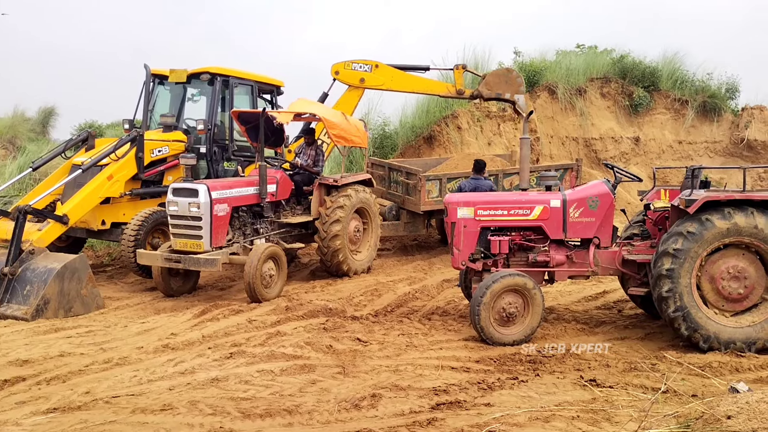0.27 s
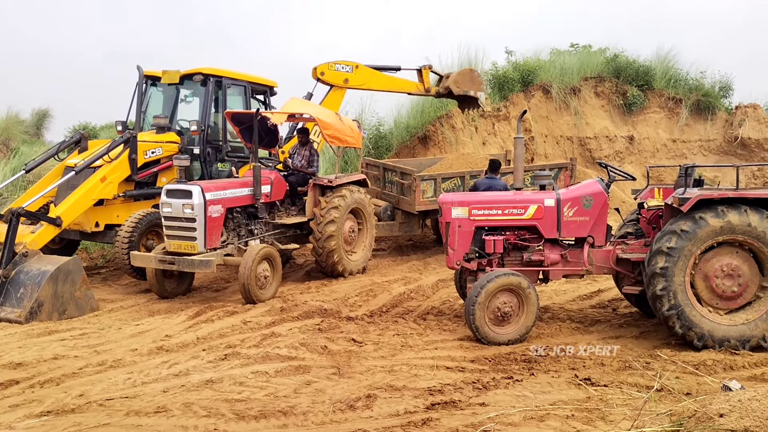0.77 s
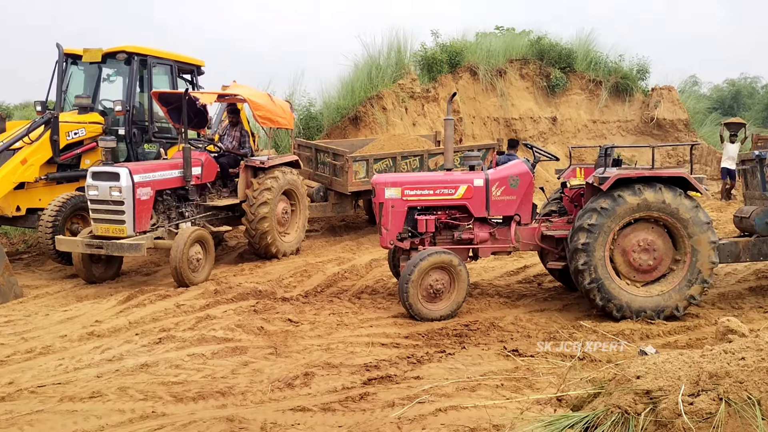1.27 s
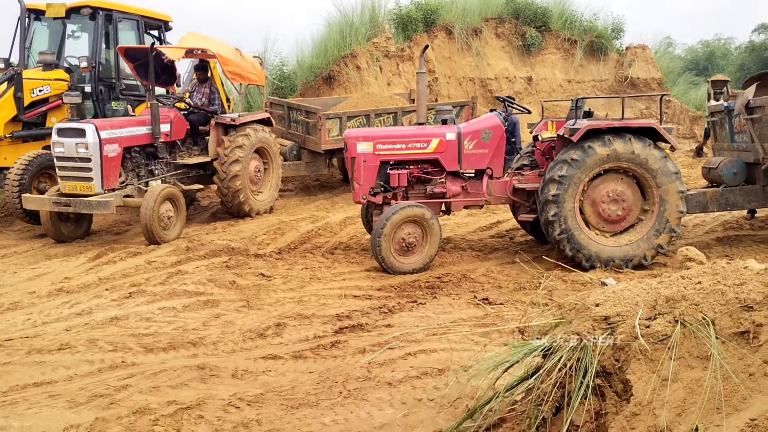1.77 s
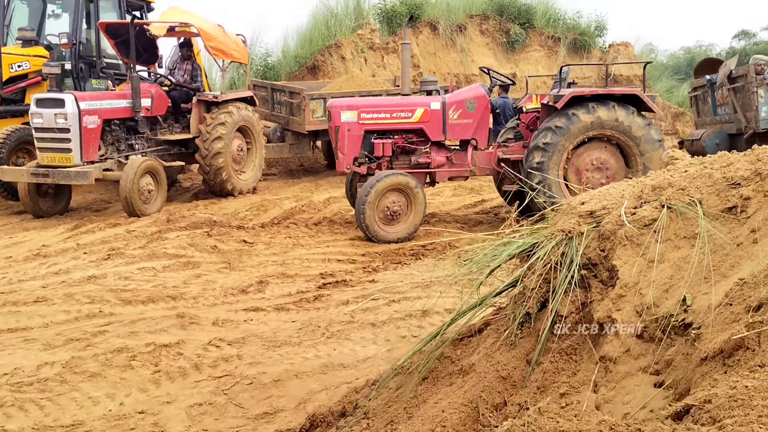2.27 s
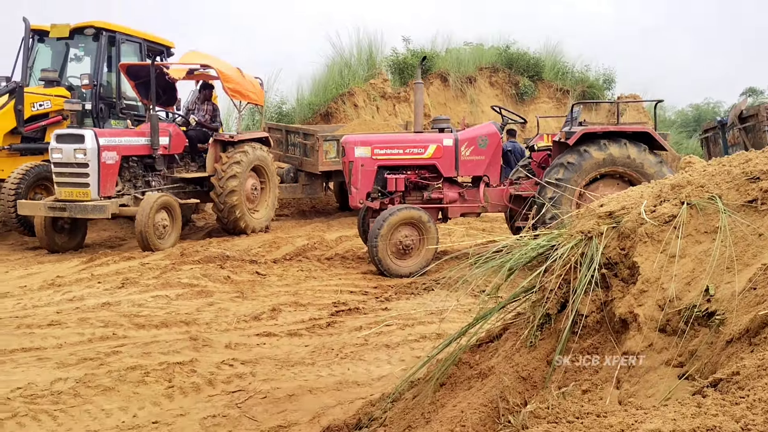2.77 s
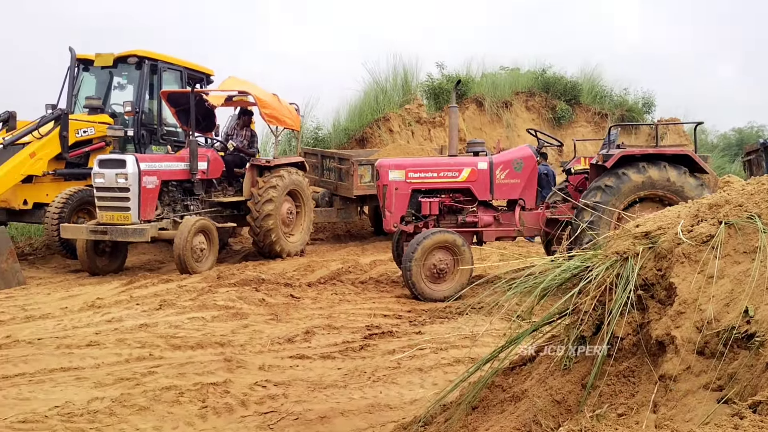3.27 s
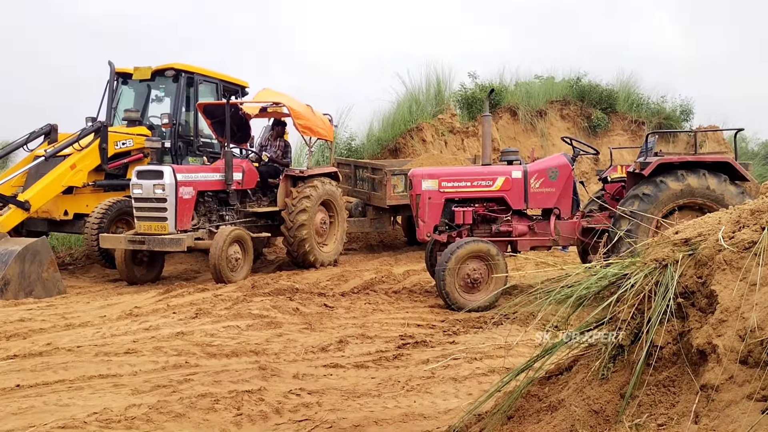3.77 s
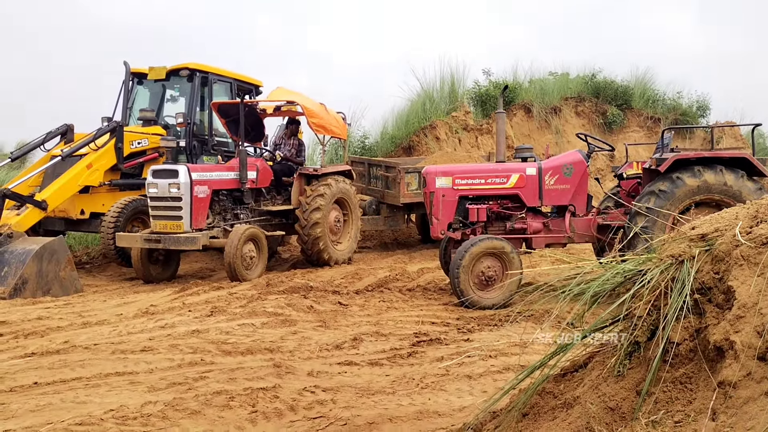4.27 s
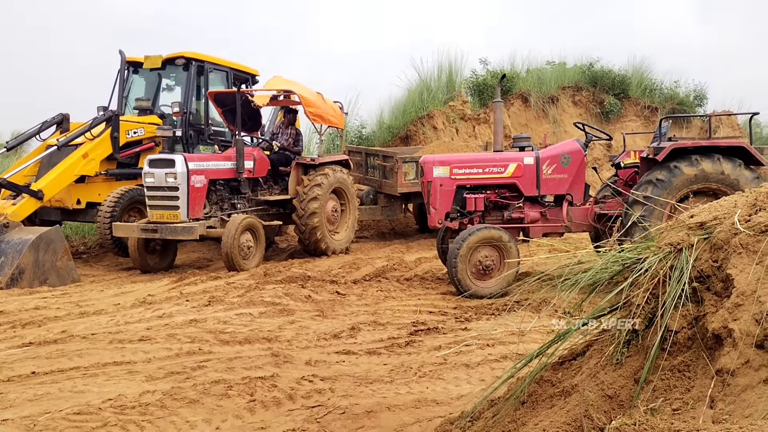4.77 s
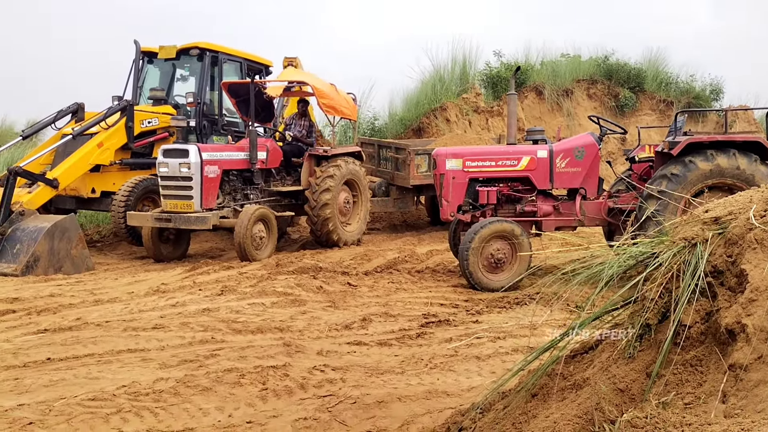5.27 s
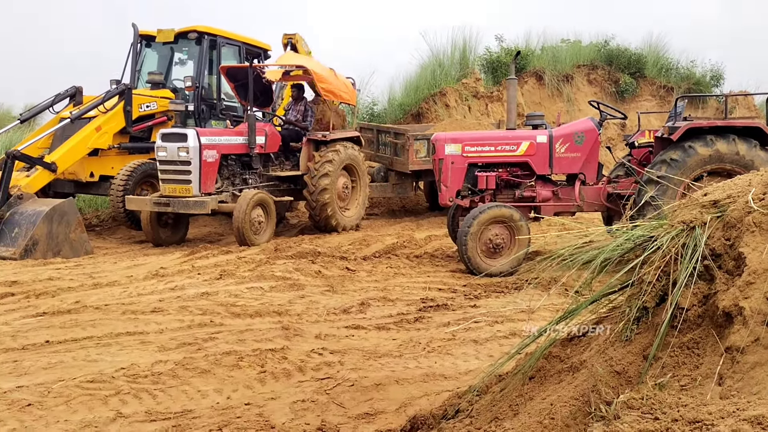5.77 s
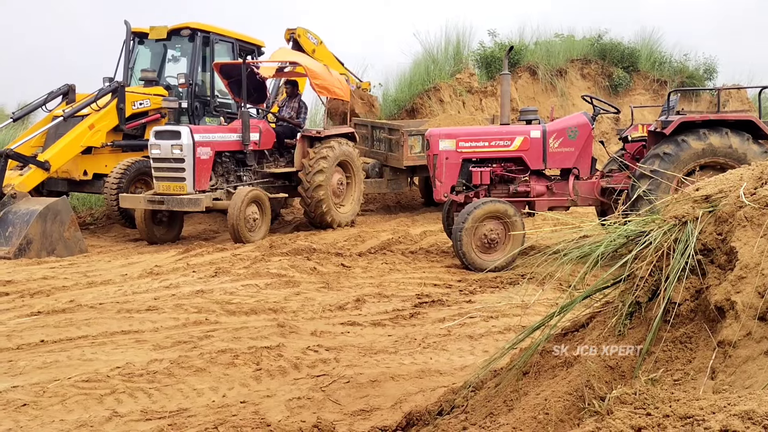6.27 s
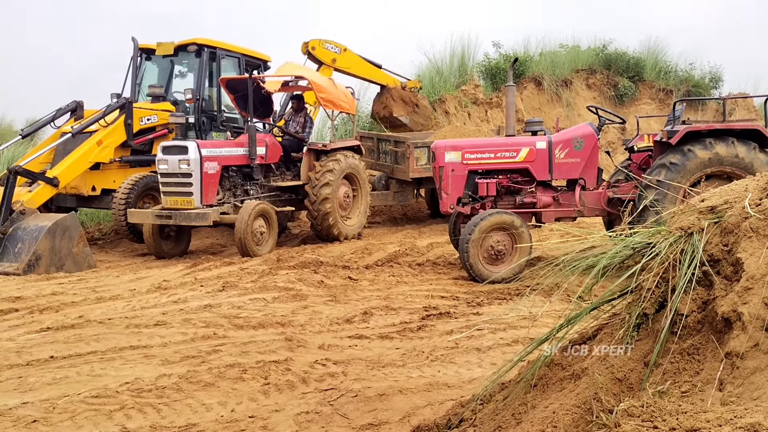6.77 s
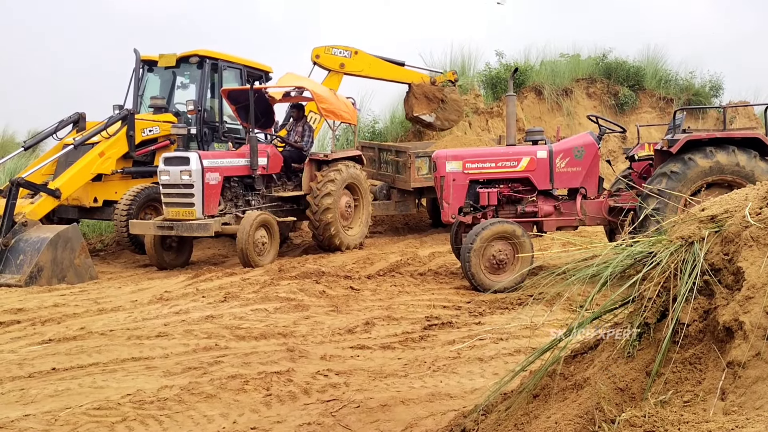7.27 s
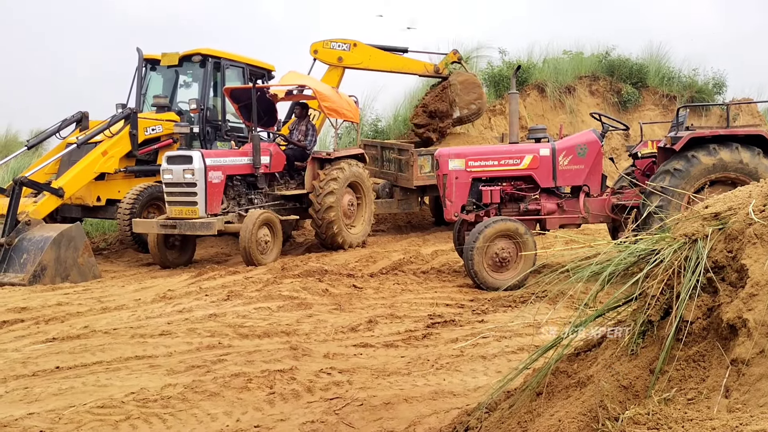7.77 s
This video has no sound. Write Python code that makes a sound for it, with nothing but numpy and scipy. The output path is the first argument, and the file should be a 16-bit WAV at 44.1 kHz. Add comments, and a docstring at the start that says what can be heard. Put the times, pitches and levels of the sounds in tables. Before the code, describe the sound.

Outdoors in a dry soil pit, diesels run throughout with no echo. From 0 s a rough, mid-pitched hydraulic whine with a lower growl rides over a near tractor's quick idle knock and bright valve rattle. A hard steel clank cracks at about 1.0 s, a lesser one at 1.2 s; the whine then drops and dies by 2.4 s, with small clanks at 2.3 s. The knock comes closer, exhaust throbs, and hollow panel clonks repeat from 2.5 to 3.1 s. The backhoe's low drone swells, and thin, very high belt chirps run at 3.5 s. From 4.4 to 5.5 s the knock fades behind an earth bank while a softer, higher whine rises in two pulses. Clods thud and steel clanks near 5.1-5.3 s. Afterwards the drone surges unevenly, panels clatter, a farther tractor ticks faster, and chirps return at 6.4 and 7.7 s until the end near 8 s.

```python
"""Backhoe and tractors in a soil pit

A backhoe loads a trolley in an open soil pit while one tractor idles close by and another farther off.
Sines locked to the firings make the exhaust drones; noise pulsed by them makes rush, knock and rattle.
The hydraulics whine as gliding bands, and the near knock fades as the microphone moves behind an earth bank.
Steel clanks, loose panels clonk, clods thud and a dry belt chirps, as bursts of noise and dying sines."""
import sys
import numpy as np
from scipy import signal
from scipy.fft import rfft, irfft, next_fast_len
from scipy.io import wavfile
from scipy.ndimage import uniform_filter1d

SR = 44100
rng = np.random.default_rng(int(sys.argv[2]) if len(sys.argv) > 2 else 0)


def pcm_store(signal):
    """Save signal as 16-bit PCM."""
    levels = np.round(np.clip(np.atleast_2d(signal), -1, 1) * 32767)
    wavfile.write(sys.argv[1], SR, levels.astype(np.int16).T)


N = 353946

# Table levels are starting levels: the functions balance, pan and shade them further.
# how much later a sound reaches the left port
TRACTOR_LAG_MS, BACKHOE_LAG_MS, TREBLE_LAG_MS = 0.395, 0.15, 0.3
# left-right likeness of most sounds of the near tractor: (pitch_hz, likeness from 0 to 1)
TRACTOR_LIKENESS = [(700, 0.74), (2600, 0.71), (5000, 0.14), (14000, 0.19)]


def from_db(db):
    """Decibels to gain."""
    return np.exp(np.asarray(db) * (np.log(10) / 20))


def rms_one(x):
    """Scale to unit power."""
    return x / np.sqrt(np.mean(x ** 2) + 1e-20)


def clock():
    """Time of each sample in seconds."""
    return np.arange(N) / SR


def in_time(rows):
    """Each column of a curve at every sample, held beyond its ends."""
    s, *columns = np.transpose(rows)
    return [np.interp(clock(), s, column) for column in columns]


def gain_curve(rows):
    """Gain at every sample from a curve of (time_s, level_db)."""
    level_db, = in_time(rows)
    return from_db(level_db)


def fade(start_s, end_s):
    """Rises from 0 to 1 between two times."""
    return np.clip((clock() - start_s) / max(end_s - start_s, .01), 0, 1)


def bins():
    """Frequencies of the spectrum of a whole-length signal."""
    return np.maximum(np.fft.rfftfreq(N, 1 / SR), 1)


def drift(knots_per_s):
    """Random curve of straight pieces between random knots, with unit power."""
    knots = rng.standard_normal(4000)
    return rms_one(np.interp(clock() * knots_per_s, np.arange(len(knots)), knots))


def colour(points):
    """Gain per frequency of a spectrum, falling 65 dB per octave past its ends."""
    hz, db = np.transpose(points)
    octaves_below = np.maximum(np.log2(hz[0] / bins()), 0)
    octaves_above = np.maximum(np.log2(bins() / hz[-1]), 0)
    inside_db = np.interp(np.log(bins()), np.log(hz), db)
    return from_db(inside_db - 65 * (octaves_below + octaves_above))


def resonances(modes):
    """Gain per frequency of modes (pitch_hz, half_width_hz, level_db), 6 dB down at the half width."""
    power = sum(from_db(2 * db) / (1 + ((bins() - hz) / half_width) ** 2) ** 2
                for hz, half_width, db in modes)
    return np.sqrt(power)


def noise(gain, lag_ms, likeness=None):
    """Coloured noise of unit power at two microphone ports; the left one hears it later."""
    # left-right likeness of the backhoe and most other sounds: (pitch_hz, likeness from 0 to 1)
    usual_likeness = [(60, 0.99), (130, 0.86), (300, 0.97), (700, 0.82), (1000, 1), (1400, 0.55),
                      (2600, 0.08), (14000, 0.12)]
    size = next_fast_len(N, real=True)
    hz = np.fft.rfftfreq(size, 1 / SR)
    points_hz, points = np.transpose(likeness or usual_likeness)
    alike = np.clip(np.interp(np.log(np.maximum(hz, 1)), np.log(points_hz), points), 0, .999)
    spectra = rfft(rng.standard_normal((2, size))) * np.interp(hz, bins(), gain)
    mid, side = spectra * np.sqrt([1 + alike, 1 - alike])
    late = np.exp(-2j * np.pi * hz * lag_ms / 1000)
    return rms_one(irfft([(mid + side) * late, mid - side], size)[:, :N])


def panned(x, left_db):
    """Louder on the left by so many dB."""
    return x * from_db([[left_db / 2], [-left_db / 2]])


def firings(rate, pattern_db, scatter_db, rise_s, decay_s, count, rest):
    """Unit-power envelope of one burst per firing, in a repeating pattern of strengths over a steady rest."""
    number = count.astype(int)
    age = (count - number) / rate
    strength = from_db(np.resize(pattern_db, 1000) + scatter_db * rng.standard_normal(1000))
    burst = strength[number] * (1 - np.exp(-age / rise_s)) * np.exp(-age / decay_s)
    return rms_one(np.sqrt(rest ** 2 + burst ** 2))


def orders(count, table, waver):
    """Sines at multiples of the firing rate, each wavering in strength."""
    out = 0
    for multiple, db in table:
        sine = np.sin(2 * np.pi * (multiple * count + rng.random()))
        out = out + from_db(db) * (1 + waver * drift(16)) * sine
    return np.sqrt(2) * out


def blows(times, levels_db, rise_s, decay_s):
    """Envelope of blows that swell quickly and die away."""
    out, age = np.zeros(N), np.arange(SR // 2) / SR
    shape = (1 - np.exp(-age / rise_s)) * np.exp(-age / decay_s)
    for s, db in zip(times, levels_db):
        i = max(int(s * SR), 0)
        out[i:i + len(age)] += from_db(db) * shape[:N - i] / shape.max()
    return out


def pings(rows, rise_s, decay_s, lag_ms, smear):
    """A dying sine per (start_s, pitch_hz, peak_db); reflections smear its phase between the ports."""
    out, age = np.zeros((2, N)), np.arange(int(10 * decay_s * SR)) / SR
    shape = (1 - np.exp(-age / rise_s)) * np.exp(-age / decay_s)
    ports = np.array([age - lag_ms / 1000, age])
    for s, hz, db in rows:
        i = int(s * SR)
        tone = np.sin(2 * np.pi * (hz * ports + rng.random()) + smear * rng.standard_normal((2, 1)))
        out[:, i:i + len(age)] += from_db(db) * (tone * shape / shape.max())[:, :N - i]
    return out


def ringing(modes, lag_ms, rate, count, pattern_db, scatter_db, decay_s, rest):
    """Each firing sets every mode ringing with a strength of its own; each mode also swells and sinks."""
    mode_swell_db = 2.0
    push, out = noise(np.ones(len(bins())), lag_ms), 0
    for hz, width, db in modes:
        drive = push * firings(rate, pattern_db, scatter_db, decay_s / 4, decay_s, count, rest)
        drive = drive * from_db(mode_swell_db * drift(11))
        band = signal.butter(2, [hz - width * 0.48, hz + width * 0.53], "band", fs=SR, output="sos")
        out = out + from_db(db) * rms_one(signal.sosfilt(band, drive))
    return out


def flickering(x, low_hz=3000, high_hz=12000, bands=14, depth_db=2.3, knots_per_s=55):
    """Neighbouring bands swell and sink, each by itself; the outer two reach past the given limits."""
    size = next_fast_len(N, real=True)
    edges = np.geomspace(low_hz, high_hz, bands - 1)
    spectrum, band = rfft(x, size), np.searchsorted(edges, np.fft.rfftfreq(size, 1 / SR))
    out = 0
    for k in range(bands):
        swell = rms_one(from_db(depth_db * drift(knots_per_s)))
        out = out + irfft(spectrum * (band == k), size)[:, :N] * swell
    return out


def backhoe_exhaust(rate, count):
    """The pipe drones at twice the firing rate; overtones and boom grow faster than the drone under load."""
    # exhaust drone: (time_s, level_db)
    drone_curve = [(0, -51.5), (.3, -48), (.56, -39), (.7, -49.5), (1.7, -47.5), (2.1, -39.5), (2.4, -38),
                   (2.7, -34.5), (3.3, -32.5), (4.35, -32), (4.65, -31), (5.35, -30.5), (5.85, -33),
                   (6.4, -30), (6.9, -32.5), (7.3, -31), (8.03, -37.5)]
    # orders of the drone, then of its overtones: (multiple of the firing rate, level_db)
    drone_orders = [(1, -29), (2, 0.5)]
    upper_orders = [(1.747, -40), (2.25, -18.5), (2.499, -5), (2.748, -9.5), (3, -1.5), (3.501, -15.5),
                    (4, -13), (5, -38), (6, -30)]
    # exhaust rush: (time_s, level_db), and its spectrum: (pitch_hz, level_db)
    rush_curve = [(0, -49), (1.4, -50), (2.6, -47.5), (3.3, -50.5), (4.5, -46.5), (5, -49), (8.03, -50.5)]
    rush_spectrum = [(20, 2), (45, -23), (70, 2.5), (110, 3), (160, -1), (200, 5), (290, -0.5), (380, -2),
                     (480, -17.5), (700, -40)]
    full_drone_db, growth_db_per_db = -30, 1.45
    upper_db, boom_db = -41, -44.5     # at full drone
    drone_db, = in_time(drone_curve)
    effort = from_db(growth_db_per_db * (drone_db - full_drone_db))
    drone = from_db(drone_db) * orders(count, drone_orders, waver=0.087)
    upper = from_db(upper_db) * effort * orders(count, upper_orders, waver=0.013)
    puffs = firings(rate, [1.5, -1.5, 0.7, -4.0], 4.3, 0.0016, 0.0084, count, rest=0.45)
    rush = gain_curve(rush_curve) * noise(colour(rush_spectrum), BACKHOE_LAG_MS)
    pipe = noise(resonances([(128.4, 12.0, 0)]), BACKHOE_LAG_MS)    # gas rings in the pipe
    boom = from_db(boom_db) * effort * pipe
    return panned(drone + puffs * rush, 0.67) + panned(upper + puffs * boom, 3.8)


def backhoe_panels(rate, count):
    """Firings ring the clattering parts and thin hood panels over a broad diesel knock."""
    # clatter, loudest as the boom starts to swing: (time_s, level_db)
    clatter_curve = [(0, -62), (1, -55), (1.6, -65.5), (2.8, -64.5), (3.5, -53.5), (4, -56), (4.45, -51.5),
                     (4.9, -57.5), (5.6, -57), (6.2, -53.5), (7, -53.5), (8.03, -60.5)]
    # the boom shakes the clatter into short surges: (start_s, peak_db)
    surges = [(4.37, -47), (6.06, -51.5), (6.75, -53), (7.23, -58), (7.71, -53)]
    # modes of the clatter, then of the hood's thin panels: (pitch_hz, width_hz, level_db)
    clatter_modes = [(489, 93, -9.5), (587, 51, -2), (805, 30, -2), (914, 76, -7), (997, 81, -4),
                     (1095, 87, -0.5)]
    hood_modes = [(1290, 32, -4.5), (1381, 47, -16.5), (1603, 90, -1.5), (1690, 62, -9)]
    # ringing of the hood: (time_s, level_db)
    hood_curve = [(0, -64), (1.6, -64), (2.6, -61.5), (3.4, -55), (4.1, -57), (4.45, -48), (4.9, -54),
                  (5.3, -54), (5.8, -55), (6.3, -50), (6.7, -57), (7.2, -49.5), (8.03, -52.5)]
    # spectrum of the broad diesel knock: (pitch_hz, level_db per Hz)
    knock_spectrum = [(650, -11.5), (850, 8.5), (1100, 3.5), (1200, -4), (1350, 11), (1700, -6.5),
                      (1900, -20.5)]
    scatter_db, knock_balance_db, lurch_db = 1.8, -6, 1.4
    shaking = np.hypot(gain_curve(clatter_curve), blows(*np.transpose(surges), rise_s=0.024, decay_s=0.032))
    clatter = shaking * ringing(clatter_modes, BACKHOE_LAG_MS, rate, count, [3.0, 4.5, 6.0, 2.5],
                                scatter_db, decay_s=0.016, rest=0.048)
    hood_level = gain_curve(hood_curve)
    hood = hood_level * ringing(hood_modes, BACKHOE_LAG_MS, rate, count, [3.7, 1.4, 1.0, 0.5],
                                scatter_db, decay_s=0.017, rest=0.068)
    hammer = firings(rate, [1.5, -1.5, 1, -1.5], 2.6, .0015, .006, count, rest=.05)
    grain = flickering(noise(colour(knock_spectrum), BACKHOE_LAG_MS),
                       low_hz=650, high_hz=1900, bands=9, depth_db=3.8, knots_per_s=28)
    knock = from_db(knock_balance_db) * np.hypot(shaking, hood_level) * hammer * grain
    lurch = rms_one(from_db(lurch_db * drift(20)))      # all panels shake in uneven knots
    panels = from_db(-1.76) * (panned(clatter, 0.37) + panned(hood, 1.2))
    return lurch * (panels + panned(knock, 1.7))


def backhoe_hiss(rate, count):
    """Fan hiss and injection sizzle spurt with the firings; the bank later hides the sizzle."""
    # fan hiss: (time_s, level_db), and its spectrum: (pitch_hz, level_db)
    hiss_curve = [(0, -57), (2.3, -60), (4.2, -56), (4.8, -58), (5.6, -60.5), (6.5, -57.5), (8.03, -54.5)]
    hiss_spectrum = [(1800, 6.5), (3000, 3), (3500, -5), (4400, -2.5), (5200, 0.5), (5600, 1.5),
                     (6400, -17), (7000, -5), (8500, -7), (10500, -5.5), (12200, -12), (15000, -25)]
    # injection sizzle: (time_s, level_db), and its spectrum: (pitch_hz, level_db per Hz)
    sizzle_curve = [(1.2, -75), (2.4, -62), (3.3, -58), (4.3, -57.5), (4.8, -80)]
    sizzle_spectrum = [(4600, 3), (5100, 2), (5900, 7), (6500, 13), (7400, -2), (8300, -1), (9100, -6),
                       (10200, 1), (11200, -26)]
    spurts = firings(rate, [0, -1, 1, -1], 1.3, 0.009, 0.006, count, rest=0.1)
    hiss = gain_curve(hiss_curve) * spurts * flickering(noise(colour(hiss_spectrum), TREBLE_LAG_MS))
    sizzle_noise = noise(colour(sizzle_spectrum), TRACTOR_LAG_MS, TRACTOR_LIKENESS)
    sizzle = gain_curve(sizzle_curve) * spurts * sizzle_noise
    return panned(hiss + sizzle, 1.5)


def backhoe():
    """Four cylinders in one firing count drive the exhaust, panels and hiss."""
    # engine speed, sagging under load at first, then hunting up and down about once a second from 4.35 s as the
    # governor overshoots: (time_s, firings per s)
    backhoe_rate = [(0, 48.9), (.3, 45.3), (.6, 49.4), (.92, 47.8), (1.25, 49.4), (2.5, 47.95),
                    (3.8, 47.35), (4.05, 47.9), (4.35, 46.1), (4.7, 48.0), (5.05, 46.8), (5.5, 48.3),
                    (6, 46.6), (6.8, 48.4), (7.05, 47.1), (7.75, 49.5), (8.03, 47.7)]
    rate, = in_time(backhoe_rate)
    count = np.cumsum(rate) / SR
    return backhoe_exhaust(rate, count) + backhoe_panels(rate, count) + backhoe_hiss(rate, count)


def whine(rows, half_width_hz, skirt_db):
    """Oil forced through a valve: a rough, narrow band that glides with the flow and keeps to its strength."""
    flutter_db, even_s = 1.8, .09
    centre_hz, level_db = in_time(rows)
    # made at 1000 Hz, then shifted to the gliding centre
    band = noise(resonances([(1000, half_width_hz, 0), (1000, 3 * half_width_hz, skirt_db)]), BACKHOE_LAG_MS)
    band = band * from_db(flutter_db * drift(40))
    power = uniform_filter1d(np.mean(band ** 2, axis=0), int(even_s * SR))
    band = band / np.sqrt(power + 1e-12)
    glide = np.exp(2j * np.pi * np.cumsum(centre_hz - 1000) / SR)
    return from_db(level_db) * (signal.hilbert(band, next_fast_len(N))[:, :N] * glide).real


def hydraulics():
    """The bucket tips with a loud whine over a lower growl; later the boom swings back more softly."""
    # whine as the bucket tips, then as the boom swings: (time_s, centre_hz, level_db)
    tip_rows = [(0, 900, -43.5), (.3, 965, -41), (.6, 965, -38.5), (0.899, 950, -44.5), (1.13, 960, -39.5),
                (1.3, 740.6, -45.5), (1.55, 690, -45), (1.849, 670, -48), (2.151, 760, -51.5),
                (2.399, 779, -62)]
    swing_rows = [(4.15, 1000, -85), (4.35, 1020, -57), (4.55, 1053, -49.5), (4.75, 1100, -48),
                  (4.9, 1267, -66), (5.15, 1266, -52.5), (5.38, 1286, -51), (5.55, 1310, -66),
                  (5.7, 1290, -73)]
    growl_rows = [(s, hz * .41, db - 11.5) for s, hz, db in tip_rows]
    tipping = whine(tip_rows, half_width_hz=101, skirt_db=-12.5)
    growl = whine(growl_rows, half_width_hz=42, skirt_db=-25)
    swinging = whine(swing_rows, half_width_hz=47, skirt_db=-9)
    return panned(tipping + growl, 0.51) + panned(swinging, 1.1)


def head_ring(count, knock_db, detune=.02, scatter_db=2.0):
    """Each firing strikes the cylinder head, every mode with a strength of its own."""
    # modes of the cylinder head: (pitch_hz, level_db)
    head_modes = [(2130, -26), (2340, -8.5), (2480, -7), (2660, -11.5), (2840, -16)]
    rows = []
    for i in np.flatnonzero(np.diff(count.astype(int))):
        for hz, db in head_modes:
            pitch_hz = hz * (1 + detune * rng.standard_normal())
            peak_db = knock_db[i] + 2.4 + db + scatter_db * rng.standard_normal()
            rows.append((i / SR, pitch_hz, peak_db))
    return pings(rows, rise_s=0.0025, decay_s=.0085, lag_ms=TRACTOR_LAG_MS, smear=0.55)


def tractor_knock(rate, count, knock_db):
    """Combustion knocks as pulsed noise with the head's ring; a hard knock is a short burst plus one mode."""
    # spectrum of the combustion knock: (pitch_hz, level_db per Hz)
    knock_spectrum = [(1500, 4), (1800, -31), (2050, 7), (2350, 14.5), (2550, 10.5), (2750, 14),
                      (2950, 8.5), (3200, -71), (3600, -41)]
    # now and then a cylinder knocks hard: (start_s, peak_db before burst and ring balance)
    hard_knocks = [(.107, -37), (.176, -46), (.370, -41.5), (.641, -40), (.679, -36), (.715, -39),
                   (.829, -35.5), (.944, -35.5), (1.100, -36), (1.176, -33), (1.242, -35), (1.282, -32),
                   (1.321, -42), (1.358, -44), (1.668, -37), (1.896, -32), (2.008, -33.5), (2.086, -35.5),
                   (2.201, -33), (2.278, -32.5), (2.389, -37), (2.503, -35.5), (2.581, -34.5), (2.694, -48),
                   (2.734, -36.5), (2.81, -35), (3.001, -34.5), (3.112, -34), (3.567, -35), (3.677, -34),
                   (3.79, -35), (4.015, -35), (4.36, -37), (4.594, -41), (4.633, -35), (4.712, -42)]
    hard_burst_db, hard_ring_db, hard_ring_hz = -4.2, -2.5, 2365
    bursts = from_db(knock_db - 3.7) * firings(rate, [0], 0.52, 0.0008, 0.016, count, rest=0.27)
    hard_bursts = from_db(hard_burst_db) * blows(*np.transpose(hard_knocks), rise_s=.001, decay_s=.005)
    bursts = np.maximum(bursts, hard_bursts)
    hard_rows = [(s, hard_ring_hz, db + hard_ring_db) for s, db in hard_knocks]
    hard_ring = pings(hard_rows, rise_s=.001, decay_s=0.0048, lag_ms=TRACTOR_LAG_MS, smear=.3)
    body = bursts * noise(colour(knock_spectrum), TRACTOR_LAG_MS, TRACTOR_LIKENESS)
    return body + head_ring(count, knock_db) + hard_ring


def tractor_rattle(rate, count, rattle_db):
    """Valve gear rattles at each firing; its colour turns as the microphone passes front, corner and flank."""
    # rattle heard from the front, the corner and the flank: (pitch_hz, level_db per Hz)
    front_spectrum = [(1200, -28), (1600, -3.5), (2200, 7.5), (3200, -9), (3800, -7.5), (4300, -10.5),
                      (4900, -7.5), (5500, -50), (6400, -10.5), (7800, -10), (9500, -17), (11000, -13),
                      (13000, -13), (15000, -45)]
    corner_spectrum = [(1200, -0.5), (1700, -0.5), (2200, 4.5), (3100, -4), (3500, -9.5), (4000, -5.5),
                       (4800, -4), (5600, -10.5), (6700, -27), (7400, -11.5), (8200, -5.5), (9200, -12.5),
                       (11000, -7), (13000, -22), (15000, -30)]
    flank_spectrum = [(3100, -48), (3400, 4), (4200, -2.5), (5100, 14.5), (5900, -0.5), (6500, -22),
                      (7400, 6), (8300, 13), (9100, 0.5), (10200, 6), (11200, 12), (12000, -55),
                      (15000, -34.2)]
    turned, beside = fade(1.17, 1.35), fade(2.0, 2.45)     # to the corner, then to the flank
    corner_noise = noise(colour(corner_spectrum), TRACTOR_LAG_MS, TRACTOR_LIKENESS)
    front_noise = noise(colour(front_spectrum), TREBLE_LAG_MS, TRACTOR_LIKENESS)
    flank_noise = noise(colour(flank_spectrum), TRACTOR_LAG_MS, TRACTOR_LIKENESS)
    corner = from_db(7.5) * np.sqrt(turned * (1 - beside)) * corner_noise
    front = from_db(8.5) * np.sqrt(1 - turned) * front_noise
    flank = from_db(3.0) * np.sqrt(beside) * flank_noise
    shake = firings(rate, [0, .5, -.5], 1.2, 0.005, 0.0095, count, rest=0.27)
    return from_db(rattle_db) * shake * flickering(front + corner + flank)


def tractor():
    """Three cylinders at idle: each firing knocks, rings the block and rattles the valve gear."""
    # engine speed: (time_s, firings per s)
    tractor_rate = [(0.0, 25.897), (0.7, 26.292), (1.4, 26.259), (2.1, 26.171), (2.8, 26.448),
                    (3.4, 26.444), (3.9, 26.913), (4.4, 25.716), (4.9, 25.48), (5.5, 26.6), (8.0, 26.5)]
    # levels as the microphone passes: (time_s, knock level_db, treble rattle level_db)
    passing = [(0, -48.5, -52.5), (.9, -46, -53.5), (1.25, -43.5, -51.5), (2.3, -43.5, -56.5),
               (3.7, -43, -57.5), (4.4, -44.5, -60.5), (4.9, -61, -74)]
    # exhaust heard from the flank, then the engine block: (time_s, level_db)
    exhaust_curve = [(0, -58), (1.6, -56), (2.3, -40), (3.1, -36.5), (4.1, -36), (4.9, -51), (8.03, -54)]
    block_curve = [(0, -43.5), (1.0, -45), (1.6, -52.5), (2.2, -52.5), (2.6, -46.5), (3.3, -49),
                   (4.5, -51.5), (4.9, -89), (8.03, -52)]
    # orders of the exhaust: (multiple of the firing rate, level_db)
    exhaust_orders = [(2, -27), (3, -14), (4, -5), (5, -23.5), (6, -17.5), (7, -28)]
    # modes of the engine block: (pitch_hz, width_hz, level_db)
    block_modes = [(570, 180, -17.5), (788.5, 37, -5), (879, 82, -11.5), (936.6, 83, -5), (1290, 39, -21)]
    rate, = in_time(tractor_rate)
    count = np.cumsum(rate) / SR + .365
    knock_db, rattle_db = in_time(passing)
    in_sight = (1 - fade(4.42, 5.5)) ** 1.9      # the earth bank shadows knock and rattle
    knock = in_sight * tractor_knock(rate, count, knock_db)
    rattle = in_sight * tractor_rattle(rate, count, rattle_db)
    top = signal.sosfilt(signal.butter(2, 8500, "high", fs=SR, output="sos"), rattle)
    below = signal.sosfilt(signal.butter(2, 8500, "low", fs=SR, output="sos"), rattle)
    # the soft top leans right with its polarity flipped, the rest leans left
    rattle = panned(below, 3.2) - panned(top, -12.0) * from_db(-20.0)
    block = gain_curve(block_curve) * ringing(block_modes, TRACTOR_LAG_MS * 0.47, rate, count, [0, 1, -1],
                                              scatter_db=2.5, decay_s=0.016, rest=0.25)
    exhaust = gain_curve(exhaust_curve) * orders(count, exhaust_orders, waver=0.17)
    return panned(knock, 3.4) + rattle + block + panned(exhaust, 3.5)


def tick_strikes():
    """The far tractor's hardest ticks: a broad, dry burst with one short ring in it."""
    # sharpest ticks: (start_s, pitch_hz, peak_db before burst and ring balance)
    sharp_ticks = [(5.424, 2540, -52), (5.483, 2690, -50.5), (5.901, 2760, -49), (6.084, 2670, -47),
                   (6.341, 2370, -49), (6.405, 2370, -50), (6.724, 2830, -49.5), (6.780, 2730, -46.5),
                   (6.890, 2865, -48), (6.947, 2670, -45), (7.249, 2690, -46), (7.287, 2725, -46.5),
                   (7.469, 2630, -60), (7.530, 2550, -48), (7.672, 2500, -46), (7.699, 2580, -44.5),
                   (7.814, 2740, -47), (7.877, 2560, -47), (7.993, 2600, -51)]
    # spectrum of the burst: (pitch_hz, level_db per Hz)
    burst_spectrum = [(850, 5), (1600, 10), (1950, -10), (2300, 3.5), (2900, 4.5), (3200, -11), (6500, -11)]
    s, _, db = np.transpose(sharp_ticks)
    burst = blows(s, db, rise_s=.001, decay_s=.008) * noise(colour(burst_spectrum), TREBLE_LAG_MS)
    ring = pings(sharp_ticks, rise_s=.0015, decay_s=.006, lag_ms=TREBLE_LAG_MS, smear=.3)
    return burst + from_db(-3) * ring


def far_tractor():
    """At idle, with more firings per second than the near tractor: strong and weak injector ticks, valve rattle."""
    # modes of the injector ticks: (pitch_hz, width_hz, level_db)
    injector_modes = [(2230, 310, -11), (2458, 150, -3.5), (2683, 134, -0.5), (2780, 160, -22)]
    # ticks and rattle together: (time_s, level_db)
    far_curve = [(4.6, -64), (5.0, -70), (5.6, -70), (5.9, -63), (6.1, -67), (6.55, -76), (6.75, -61),
                 (8.03, -60.5)]
    rate = 35.4      # firings per s
    count = rate * clock()
    ticks = ringing(injector_modes, TREBLE_LAG_MS, rate, count, [3, -2, 3, -2],
                    scatter_db=3.5, decay_s=0.008, rest=0.14)
    taps = firings(rate, [2, -2, 2, -2], 3.9, .003, 0.017, count, rest=0.22)
    rattle_noise = noise(colour([(3400, -13), (5200, -2), (6500, 23), (11000, -9)]), TREBLE_LAG_MS)
    rattle = from_db(-14) * taps * rattle_noise
    return panned(gain_curve(far_curve) * (ticks + rattle) + tick_strikes(), 4.5)


def whistles(waver_db=3):
    """Thin wavering lines behind the engines, made of narrow noise bands."""
    # the lines: (pitch_hz, half_width_hz, level_db)
    whistle_lines = [(1588, 12, 4), (5130, 70, -8), (5915, 70, -6), (6375, 110, 0)]
    # all lines together: (time_s, level_db)
    whistle_curve = [(0, -64), (1.1, -61.5), (1.4, -68), (2.4, -104), (3.2, -69.5), (4.4, -60.5),
                     (5.5, -67), (8.03, -64)]
    level_db, = in_time(whistle_curve)
    return from_db(level_db + waver_db * drift(40)) * noise(resonances(whistle_lines), TREBLE_LAG_MS)


def loading():
    """The bucket clanks with a short crack on top; clods land with a rush and set the trolley's floor booming."""
    # clods land in the trolley: (start_s, floor pitch_hz, peak_db before rush and boom balance)
    thuds = [(0.544, 269, -44.5), (.945, 390, -44.5), (1.199, 292, -44.5), (1.88, 241, -42.5),
             (2.289, 275, -43.5), (2.34, 296, -43.5), (2.399, 315, -49), (2.469, 319, -53),
             (2.838, 334, -43), (2.9, 311, -53), (3.92, 280, -47), (4.351, 337, -41.5), (5.121, 330, -38.5),
             (5.501, 412, -49), (6.041, 299, -48.5), (7.379, 364, -44), (7.441, 344, -45),
             (7.52, 338, -43.5), (7.83, 315, -44)]
    # steel clanks: (start_s, ring level_db, bright crack level_db)
    clanks = [(1.033, -32, -40), (1.049, -46, -46), (1.068, -40, -52), (1.197, -39.5, -48),
              (1.213, -42, -55), (1.229, -43, -60), (2.29, -45, -43), (2.318, -48, -45), (5.12, -47.5, -58),
              (5.305, -38, -55)]
    # modes of bucket and trolley: (pitch_hz, half_width_hz, level_db)
    steel_modes = [(588, 31, 18), (990, 27, 9.5), (1340, 140, -17), (1460, 180, 12.5), (2370, 160, 3.5),
                   (3350, 420, -2)]
    s, ring_db, crack_db = np.transpose(clanks)
    ring = blows(s, ring_db, rise_s=.0004, decay_s=.015) * noise(resonances(steel_modes), BACKHOE_LAG_MS)
    snap = blows(s, crack_db, rise_s=.0004, decay_s=.018)
    crack_spectrum = [(1400, -18), (2500, 16.5), (3800, 6.5), (6000, 2), (12000, -10)]
    crack = snap * noise(colour(crack_spectrum), BACKHOE_LAG_MS)
    s, _, db = np.transpose(thuds)
    soil = noise(resonances([(339, 69, 0.0), (580, 140, -10.5)]), BACKHOE_LAG_MS)
    rush = blows(s, db - 4, rise_s=0.01, decay_s=0.039) * soil
    boom = from_db(-1.5) * pings(thuds, rise_s=0.02, decay_s=0.042, lag_ms=BACKHOE_LAG_MS, smear=.1)
    return ring + crack + rush + boom


def clonks():
    """Loose sheet-metal panels are shaken against their mounts and ring briefly and hollowly."""
    # the strikes: (start_s, pitch_hz, peak_db)
    clonk_rows = [(.969, 972, -39), (1.112, 1020, -34), (2.443, 815, -49), (2.526, 967, -38),
                  (2.61, 920, -40.5), (2.694, 792, -42), (2.777, 795, -37.5), (2.945, 785, -44),
                  (3.112, 805, -38), (3.872, 805, -38.5), (4.288, 813, -41), (4.374, 791, -45),
                  (5.64, 1014, -46), (5.81, 805, -41.5), (5.893, 830, -45), (6.193, 1037, -41.5),
                  (6.325, 990, -43.5), (6.572, 1020, -43.5), (6.9, 820, -43), (7.25, 954, -35),
                  (7.49, 968, -43.5)]
    # their partials: (multiple of the pitch, level_db)
    partials = [(1, 1), (1.191, -8.5)]
    rows = [(s, hz * multiple, db + partial_db)
            for s, hz, db in clonk_rows for multiple, partial_db in partials]
    return panned(pings(rows, rise_s=0.0019, decay_s=0.019, lag_ms=0.15, smear=0.76), 0.84)


def belt(rasp=.5, scatter_db=1.5, end_drop_db=4):
    """A dry belt slips in runs of short, rasping sine chirps; each run tends to be loudest in its middle."""
    # runs of chirps: (start_s, number of chirps, spacing_s, peak_db)
    chirp_runs = [(1.401, 2, .161, -58), (1.921, 2, .171, -57), (3.382, 2, .037, -60),
                  (3.457, 13, .0374, -53), (4.128, 2, .042, -61), (4.923, 2, .152, -58),
                  (5.022, 2, .151, -62), (5.424, 4, .0595, -55), (6.07, 2, .154, -59),
                  (6.404, 11, .0538, -51), (7.063, 2, .056, -51.5), (7.23, 2, .061, -50.5),
                  (7.646, 7, .0566, -50.5)]
    pitch_hz, spread_hz, length_s = 10780, 28, .03
    out, age = np.zeros((2, N)), np.arange(int(length_s * SR)) / SR
    ports = np.array([age - TREBLE_LAG_MS / 1000, age])
    for s, chirps, spacing_s, peak_db in chirp_runs:
        for k in range(chirps):
            hz = pitch_hz + spread_hz * rng.standard_normal()
            chirp = np.hanning(len(age)) * np.sin(2 * np.pi * hz * ports)
            i = int((s + k * spacing_s) * SR)
            off_centre = (2 * k + 1) / chirps - 1
            level_db = peak_db - end_drop_db * off_centre ** 2 + scatter_db * rng.standard_normal()
            out[:, i:i + len(age)] += from_db(level_db) * chirp[:, :N - i]
    return panned(out * (1 + rasp * drift(300)), -6.0)


def scene():
    """Everything sounds in the open air, with no room."""
    engines = backhoe() + hydraulics() + tractor() + far_tractor()
    return engines + whistles() + loading() + clonks() + belt()


def record(dry):
    """The top is cut steeply above 15.4 kHz."""
    return signal.sosfilt(signal.ellip(10, .1, 80, 15400, fs=SR, output="sos"), dry)


dry = scene()
out = record(dry)
pcm_store(out)
```